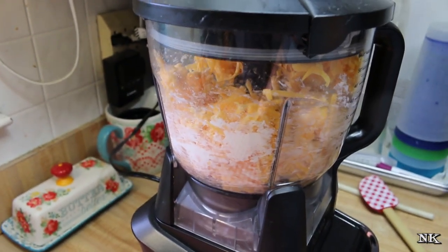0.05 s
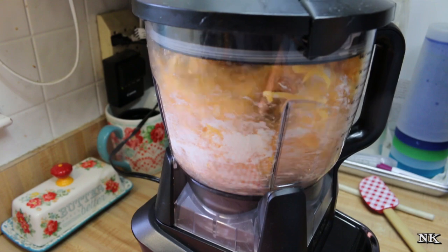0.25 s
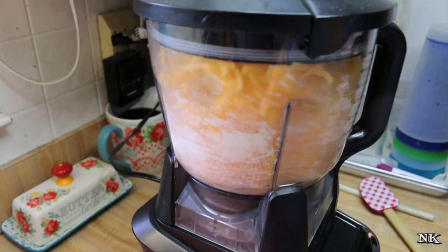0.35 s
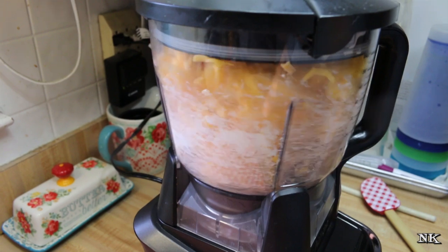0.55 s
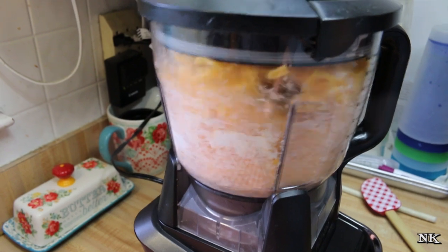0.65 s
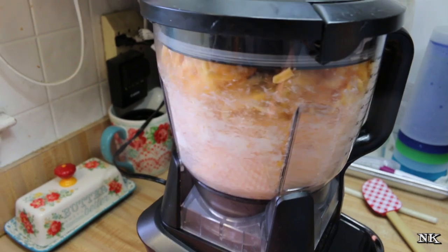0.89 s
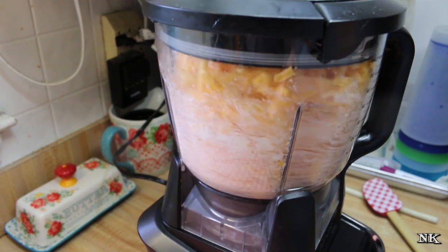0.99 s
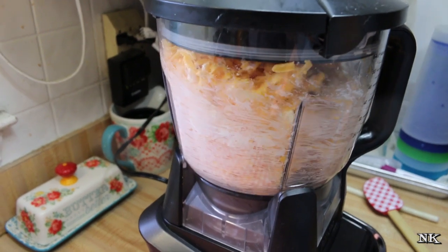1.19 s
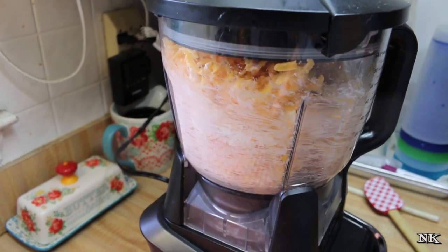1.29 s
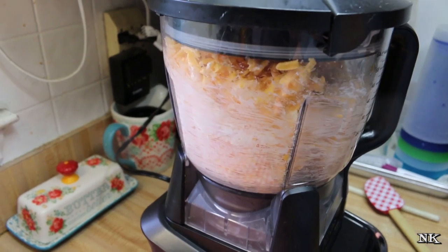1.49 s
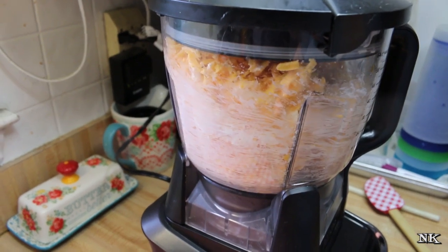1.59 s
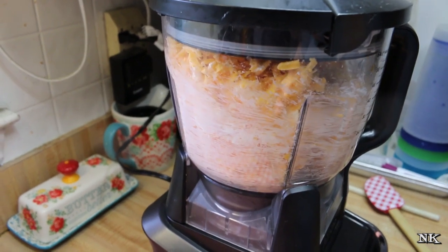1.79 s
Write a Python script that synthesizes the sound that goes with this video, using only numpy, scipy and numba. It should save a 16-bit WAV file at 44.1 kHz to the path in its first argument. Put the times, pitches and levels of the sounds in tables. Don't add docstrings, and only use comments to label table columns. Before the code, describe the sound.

A countertop food processor runs for one short pulse in a small kitchen, close microphone: button click, harsh motor grunt, quick rising whine with plastic rattle and lumps knocking the bowl, then a coast down to quiet room hum.

```python
import sys
import numpy as np
from scipy import signal
from scipy.io import wavfile
from scipy.ndimage import uniform_filter1d
from numba import njit

SR = 44100
rng = np.random.default_rng(int(sys.argv[2]) if len(sys.argv) > 2 else 0)


def store_pcm(level_fs):
    pcm = np.round(np.clip(level_fs, -1, 1) * 32767).astype(np.int16)
    wavfile.write(sys.argv[1], SR, np.atleast_2d(pcm).T)


def undo_db(level):
    steps = np.asarray(level, float) / 20
    return 10 ** steps


N = 81585
T = np.arange(N) / SR

# freq_hz, density_db
ROOM_SPECTRUM = [(25, 6), (68, -13.5), (119, -7.5), (215, -11.5), (420, -15.5), (1500, -15.5),
                 (5000, -28.5), (8000, -45), (15500, -40.5)]
# freq_hz, width_hz, level_db
ROOM_HUMS = [(62.6, 26, -41.5), (225, 33, -43.5), (369, 9.7, -47.5), (1190, 83, -47.5), (1720, 100, -49.5)]
# start_s, level_db, centre_hz
TICKS = [
    (.2442, -38, 8000),
    (.335, -40, 11000),
    (.482, -36, 11500),
    (.552, -39, 11500),
    (.871, -39, 12000),
    (1.0, -40, 12000),
    (1.0635, -36, 12000),
    (1.126, -46, 11500),
]
# start_s, level_db, pitch_hz, decay_s
KNOCKS = [(0.37, -26, 150, 0.031), (0.424, -15, 665, 0.038), (0.496, -16, 680, 0.023),
          (.612, -16.5, 686, 0.024), (0.71, -23, 740, 0.034), (.77, -18, 660, 0.023),
          (0.842, -31, 680, .03), (.9, -23, 613, .025), (1.09, -24.5, 730, .02), (.39, -17.5, 1410, 0.024),
          (.25, -19.5, 397, 0.028), (1.06, -27.5, 1130, .04), (0.786, -21, 2840, 0.038),
          (.84, -22, 770, 0.022), (1.08, -30, 270, .04), (1.17, -33.5, 480, 0.042),
          (1.194, -29, 254, 0.041), (1.16, -28, 940, 0.034)]
# freq_hz, density_db
AIR_SPECTRUM = [(40, -13), (170, -3), (800, -9.5), (2700, -8.5), (4500, -18), (6000, -20.5), (10000, -24.5),
                (15500, -36)]
# multiple_of_buzz, level_db
BUZZ_HARMONICS = [(1, -2), (2, -2), (3, 0), (4, -1), (5, -7), (6, -14), (8, -16)]
# freq_hz, width_hz, level_db
HOUSING_MODES = [(243, 16.7, 3), (388, 150, -18), (512, 56, -2.5), (631, 47, 4), (758.6, 23.6, 3),
                 (869, 24, -1.5), (1390, 110, 2.5), (1644, 150, -2.5), (1875, 123, -7.5), (2077, 65, -4),
                 (2600, 120, -15), (3455, 300, -9.5), (5340, 480, -13.5)]
# freq_hz, width_hz, boost_db
PANEL_MODES = [(645, 40, 9), (770, 50, 14), (866, 30, 19), (1395, 90, 13), (1560, 70, 7), (1900, 70, 7),
               (2100, 90, 11)]
# time_s, mesh_hz, drive_db, whine_db
MOTOR = [(.25, 993.6, -24, -31), (.28, 1300, -27, -34), (.298, 1400, -24.5, -25), (.345, 1831, -21, -31),
         (.39, 2092, -20.5, -28.5), (.43, 2214, -26.5, -27), (.5, 2426, -23, -28.5), (.62, 2643, -23, -28),
         (.72, 2684, -24, -30), (.76, 2610, -21, -30), (.82, 2190, -22, -33), (.875, 1904, -22, -28),
         (.955, 1390, -24, -30.5), (1.0, 1300, -26.5, -37), (1.09, 1025, -28, -35), (1.16, 793, -33, -47),
         (1.26, 480, -55, -50)]
TONE_ORDERS = [.096, .3225, .65, 1., 1.325, 2.]
TONE_DB = [-1, -12, -13, 1, 0, -12]
TONE_COASTING_DB = [-6, -3, -20, 0, -20, -6]
TONE_SPEED_POWER = [1, 1, 0, 0, 2.5, 2]

ON_S, OFF_S, STOP_S = .243, .76, 1.23


def unit(x):
    return x / np.sqrt(np.mean(x ** 2))


@njit
def resonate(x, hz, width_hz):
    y = np.empty(len(x))
    band, low = 0., 0.
    g, damping = np.tan(np.pi * hz / SR), width_hz / hz
    for i in range(len(x)):
        v = (band + g * (x[i] - low)) / (1 + g * (g + damping))
        band = 2 * v - band
        low = low + 2 * g * v
        y[i] = damping * v
    return y


def noise_band(hz, width_hz):
    return resonate(rng.standard_normal(N), float(hz), float(width_hz))


def walk(rate_hz):
    hold = int(SR / rate_hz)
    steps = np.repeat(rng.standard_normal(N // hold + 1), hold)
    smooth = uniform_filter1d(uniform_filter1d(steps, hold), hold)
    return unit(smooth[:N])


def shaped_noise(spectrum, flicker_db, tilt_db=0.):
    freq_hz, density_db = np.array(spectrum).T
    out = 0
    for hz in 28 * 2 ** np.arange(0, 9.2, 1 / 3):
        band = resonate(noise_band(hz, hz / 3), hz, hz / 2)
        level_db = np.interp(np.log(hz), np.log(freq_hz), density_db)
        level_db = level_db + flicker_db * walk(13.76) + tilt_db * np.log2(1 + hz / 2000)
        out = out + band * undo_db(level_db)
    return out


def burst(start_s, level_db, hz, width_hz, decay_s):
    since_s = np.clip(T - start_s, 0, None)
    envelope = (T > start_s) * np.minimum(since_s / (0.11 * decay_s), 1) * np.exp(-since_s / decay_s)
    ringing = resonate(noise_band(hz, width_hz), float(hz), 2. * width_hz)
    return undo_db(level_db) * unit(ringing) * envelope


def motor(column):
    table = np.array(MOTOR)
    return np.interp(T, table[:, 0], table[:, column])


def mesh_hz():
    return motor(1)


def drive_db():
    return motor(2)


def turning():
    rise_s, fade_s = .006, .03
    return np.clip((T - ON_S) / rise_s, 0, 1) * np.exp(-np.clip(T - STOP_S, 0, None) / fade_s)


def room_noise():
    duck_db, recover_from_s, recover_s = -4.5, 1.38, 0.23
    hum = sum(undo_db(db) * unit(noise_band(hz, width_hz)) for hz, width_hz, db in ROOM_HUMS)
    hiss = unit(shaped_noise(ROOM_SPECTRUM, 1.3)) * undo_db(-38)
    duck = (T > ON_S) * np.clip(1 - (T - recover_from_s) / recover_s, 0, 1)
    return (hiss + hum) * undo_db(duck_db * duck)


def button_press():
    tap = burst(.2, -43, 1300, 0.51 * 1300, 0.0059)
    thud = burst(.225, -49, 220, 0.51 * 220, 0.0059)
    return tap + thud


def ticks():
    return sum(burst(start_s, db, hz, .6 * hz, .0012) for start_s, db, hz in TICKS)


def knocks():
    return sum(burst(start_s, db, hz, max(.22 * hz, 130), decay_s) for start_s, db, hz, decay_s in KNOCKS)


def air():
    treble_per_speed, flicker_db = 1.15, 1
    speed_db = 20 * np.log10(mesh_hz() / mesh_hz().max())
    noise = unit(shaped_noise(AIR_SPECTRUM, flicker_db, .5 * treble_per_speed * speed_db))
    return noise * undo_db(-0.5 + drive_db()) * turning()


def buzz():
    buzz_hz, slip_turns, rough_db = 120.6, .085, 2.
    inrush_db, inrush_hold_s, inrush_fall_s = -21.5, .042, .008
    pull_db, pull_fall_s, running_db = -21, .12, -36
    since_s = T - ON_S
    gate = np.clip(since_s / 0.0054, 0, 1) * np.clip((OFF_S - T) / 0.011, 0, 1)
    inrush = undo_db(inrush_db) * np.exp(-np.clip(since_s - inrush_hold_s, 0, None) / inrush_fall_s)
    running = undo_db(pull_db) * np.exp(-np.abs(since_s) / pull_fall_s) + undo_db(running_db)
    out = 0
    for k, db in BUZZ_HARMONICS:
        strength = inrush + running * (k < 3) * k / 2
        level = strength * undo_db(db + rough_db * walk(50.6))
        turns = k * buzz_hz * since_s + slip_turns * walk(59.8) + rng.random()
        out = out + level * np.sin(2 * np.pi * turns)
    return gate * out


def housing(x):
    out = 0
    for k, (hz, width_hz, db) in enumerate(HOUSING_MODES):
        out = out + (-1) ** k * undo_db(db) * resonate(x, float(hz), float(width_hz))
    return out


def rattle():
    idle_per_s, per_tooth, spread_db, flicker_db = 3000, 1.5, 2., 1.5
    chance, size = rng.random((2, N))
    rate_per_s = idle_per_s + per_tooth * mesh_hz()
    strength = undo_db(-spread_db * np.log(1 - size)) * rng.standard_normal(N)
    hits = (chance < rate_per_s / SR) * strength
    ringing = unit(housing(hits * undo_db(flicker_db * walk(20.06))))
    return ringing * undo_db(-1 + drive_db()) * turning()


def panel_boost(tone_hz):
    power = 1
    for hz, width_hz, boost_db in PANEL_MODES:
        power = power + undo_db(2 * boost_db) / (1 + (2 * (tone_hz - hz) / width_hz) ** 2)
    return np.sqrt(power)


def whine():
    wander_share, flutter_db, rough_db, unload_s = .008, 1.2, 3.5, .06
    mesh = mesh_hz()
    speed = mesh / mesh.max()
    coasting = np.clip((T - OFF_S) / unload_s, 0, 1)
    turns = np.cumsum(mesh * (1 + wander_share * (1 + coasting) * walk(60))) / SR
    out = 0
    for order, db, coast_db, power in zip(TONE_ORDERS, TONE_DB, TONE_COASTING_DB, TONE_SPEED_POWER):
        level_db = db + coast_db * coasting + flutter_db * walk(45.45) + rough_db * walk(250)
        tone = np.sin(2 * np.pi * order * turns)
        out = out + panel_boost(order * mesh) * speed ** power * undo_db(level_db) * tone
    return out * undo_db(motor(3)) * turning()


def kitchen_echo(dry):
    t60_s, level_db, width_hz = 0.36, -12, 3370.
    t = T[:SR // 2]
    noise = resonate(rng.standard_normal(len(t)), 0.33 * width_hz, width_hz)
    tail = noise * undo_db(-60 * t / t60_s) * (t > .004)
    wet = signal.fftconvolve(dry, tail / np.sqrt(np.sum(tail ** 2)))[:N]
    return undo_db(level_db) * wet


def scene():
    machine = whine() + rattle() + air() + buzz() + (knocks() + ticks() + button_press())
    return (machine + kitchen_echo(machine) + room_noise())[None]


def roll_off(x):
    return signal.sosfilt(signal.butter(12, 15790, fs=SR, output="sos"), x)


def record(dry):
    overshoot_db, clamp_s, clamp_fall_s, top_hz = 4, 0.295, 0.0094, 15400
    overshoot = (T > ON_S) * np.exp(-np.clip(T - clamp_s, 0, None) / clamp_fall_s)
    limited = np.tanh(0.79 * dry * undo_db(overshoot_db * overshoot)) / 0.81
    top_cut = signal.ellip(8, .2, 60, top_hz, fs=SR, output="sos")
    mix = signal.sosfilt(top_cut, limited)
    return roll_off(mix)


dry = scene()
out = record(dry)
store_pcm(out)
```